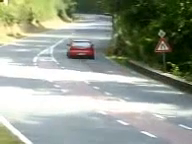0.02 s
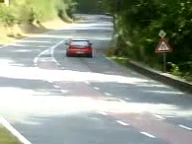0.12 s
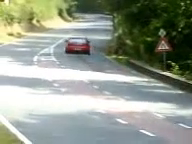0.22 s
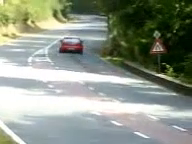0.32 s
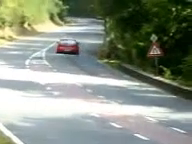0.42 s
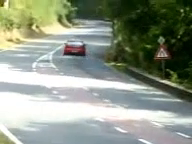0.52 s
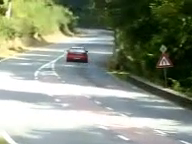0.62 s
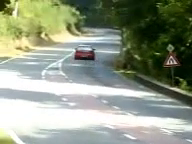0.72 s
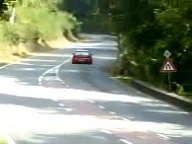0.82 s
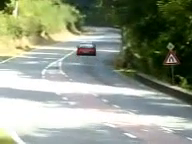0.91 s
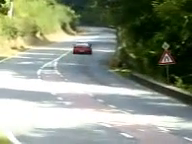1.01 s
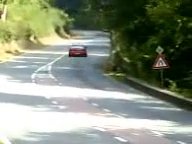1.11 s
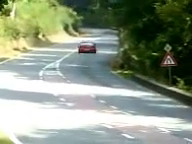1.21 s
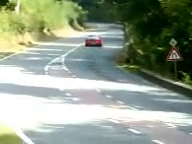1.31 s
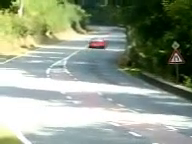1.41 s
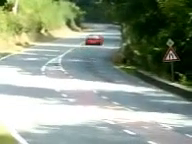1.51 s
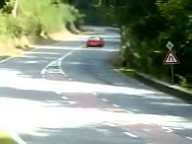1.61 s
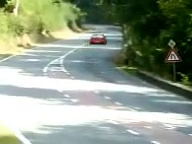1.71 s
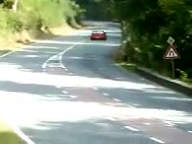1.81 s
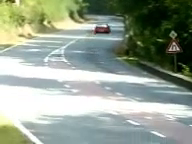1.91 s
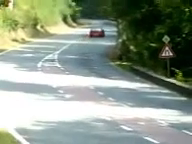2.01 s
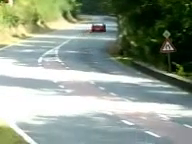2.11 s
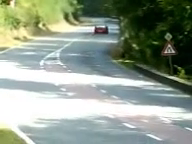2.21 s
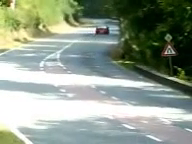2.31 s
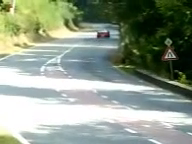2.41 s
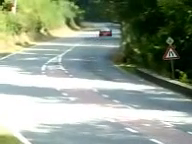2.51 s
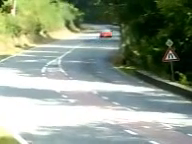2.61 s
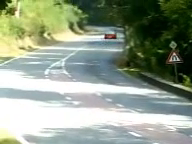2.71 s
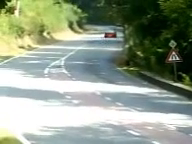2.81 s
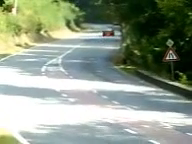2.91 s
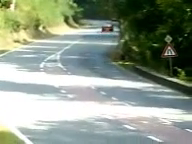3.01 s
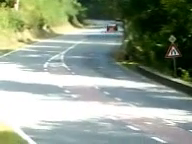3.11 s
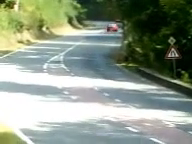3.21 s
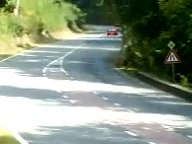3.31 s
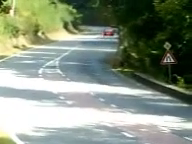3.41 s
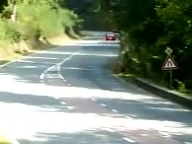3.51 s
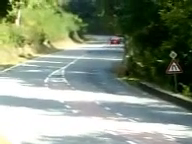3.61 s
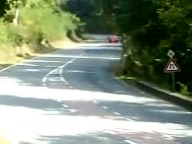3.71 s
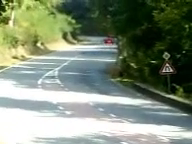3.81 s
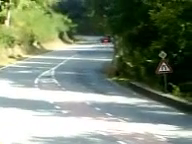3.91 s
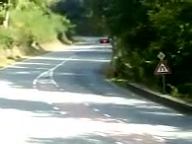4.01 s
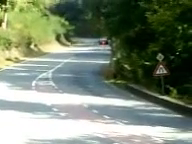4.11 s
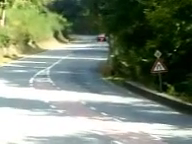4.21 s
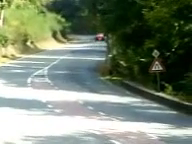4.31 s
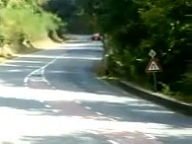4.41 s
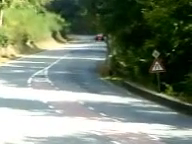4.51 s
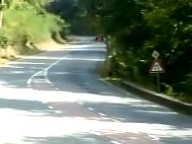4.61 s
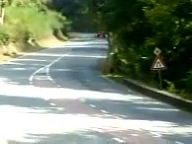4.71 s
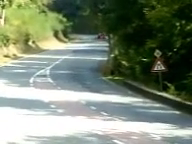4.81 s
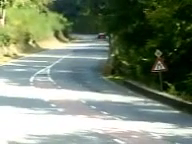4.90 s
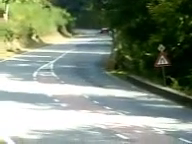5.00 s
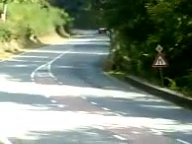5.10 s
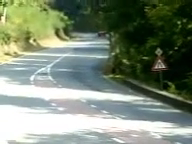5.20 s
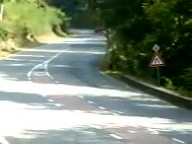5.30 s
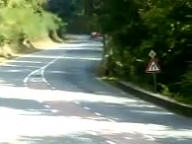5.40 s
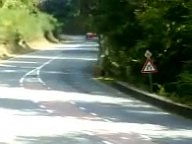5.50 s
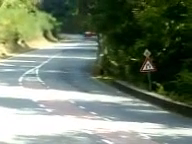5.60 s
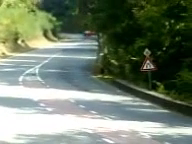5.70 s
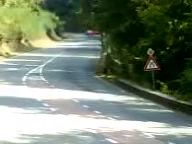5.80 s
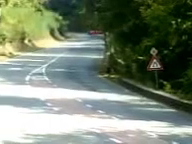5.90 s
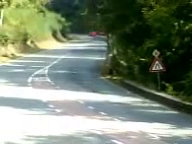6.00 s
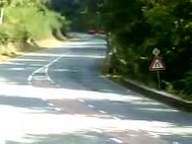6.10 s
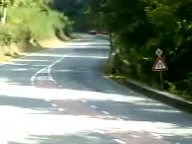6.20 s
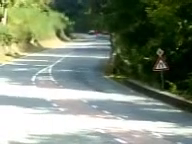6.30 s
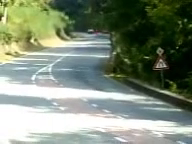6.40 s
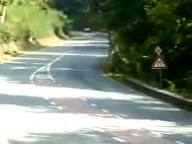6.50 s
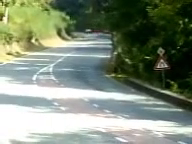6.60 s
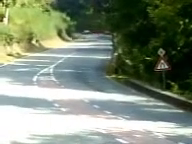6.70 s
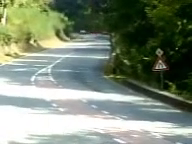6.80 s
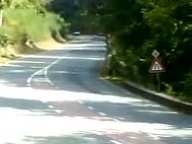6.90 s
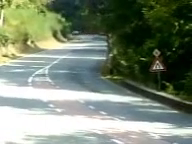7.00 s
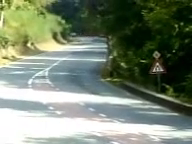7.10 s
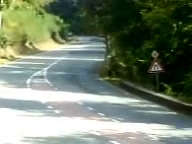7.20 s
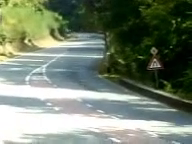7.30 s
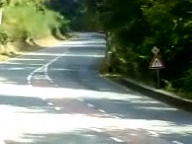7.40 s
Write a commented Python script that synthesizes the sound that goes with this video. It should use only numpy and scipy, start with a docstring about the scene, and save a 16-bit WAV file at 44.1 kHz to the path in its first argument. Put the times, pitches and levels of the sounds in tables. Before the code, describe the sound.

From 0 s a four-cylinder race car is already close and leaving at full throttle: a loud, gritty exhaust blare with low boom, honk, tearing upper rasp, gas hiss and tyre rumble, overloading the microphone into fine crackle. Within about 1 s the hiss and rumble fall away sharply. The engine stays in one gear, its firing note climbing smoothly from about 150 to 190 Hz by the end, the climb gradually easing. Around 2.4 s a brassy rasp flares, then it thins; near 3.9 s a narrower, nasal buzz stands out, followed by a low boom around 4.3 s. Near 5.4 s the boom and honk return briefly, then the sound becomes darker and more distant, with a last hollow honk around 7 s before weakening to 7.5 s. Short diffuse echoes from trees and banks blur it throughout. The outdoor pickup is narrow-band, with little above 4 kHz besides the crackle.

```python
"""Race car pulling away up a wooded hill road

A four-cylinder car leaves at full throttle, its revs climbing in one long gear: a stack of firing orders
booms low down and rasps higher up, its colour shifting as the car bends away between the banks.
Noise bands make the gas, hiss and tyre rumble; a decaying noise tail makes the echo from the trees.
A narrow-band microphone overloads while the car is still close."""
import sys
import numpy as np
from scipy import signal
from scipy.fft import rfft, irfft, next_fast_len
from scipy.io import wavfile
from scipy.ndimage import uniform_filter1d, minimum_filter1d

SR = 44100
rng = np.random.default_rng(int(sys.argv[2]) if len(sys.argv) > 2 else 0)


def unload_wav(signal):
    """Save mono or channel-first audio to the path in sys.argv[1] as 16-bit WAV at rate SR, clipped to [-1, 1]."""
    wavfile.write(
        sys.argv[1],
        SR,
        np.round(np.clip(np.atleast_2d(signal).T, -1, 1) * 32767).astype(np.int16),
    )


N = 330309
T = np.arange(N) / SR
SLOW_T = T[::64]  # slow clock for levels and wavering

# engine speed, its climb easing as drag builds: t/s, firing rate f/Hz
ENGINE_SPEED = [(0, 150.3), (1.05, 157.4), (2.1, 163.8), (3.3, 171.6), (4.5, 176.3), (5.75, 184.6),
                (6.9, 188.5), (7.49, 190.6)]


def undb(db):
    """Decibels to gain."""
    return 10 ** (np.asarray(db) / 20)


def unit(x):
    """Scale to rms 1."""
    return x / np.sqrt(np.mean(np.abs(x) ** 2))


def curves(table, t=T):
    """The columns of a table after the first, interpolated at the times t."""
    s, *columns = np.transpose(table)
    return [np.interp(t, s, column) for column in columns]


def colour(x, points):
    """Filter by a (Hz, dB) spectrum, straight between points on a log frequency scale."""
    size = next_fast_len(N + 4096)
    point_hz, point_db = np.transpose(points)
    bin_hz = np.maximum(np.arange(size // 2 + 1) * SR / size, 1)
    gain = undb(np.interp(np.log(bin_hz), np.log(point_hz), point_db))
    return irfft(rfft(x, size) * gain, size)[:N]


def wander(hz):
    """Smooth chance of rms 1 on the slow clock, with most of its motion under hz."""
    keep = np.exp(-2 * np.pi * hz * SLOW_T[1])
    size = len(SLOW_T)
    noise = rng.standard_normal(2 * size)
    # two equal one-pole smoothers; the first half is run-in
    return unit(signal.lfilter([1], np.poly([keep, keep]), noise)[size:])


def fast(slow):
    """From the slow clock to the sample clock."""
    return np.interp(T, SLOW_T, slow)


def exhaust(turns, rough, scatter=1.0, scatter_hz=28, firing_db=1.25):
    """Firing note as a stack of orders; turbulent gas and air make the high ones flutter most."""
    # strength of the four cylinders in firing order, at roughness 1: level/dB
    cylinder_db = [-0.15, 0.66, -2.2, -0.44]
    note = np.zeros(N)
    for order, level in enumerate(order_levels(), 1):
        spread = scatter * rough * order / (order + 10.0)
        # a steady part plus a scattered part, at constant mean power
        scattered = wander(scatter_hz) + 1j * wander(scatter_hz)
        path = (1 + spread * scattered) / np.sqrt(1 + 2 * spread ** 2)
        phase = np.unwrap(np.angle(path)) + rng.uniform(0, 2 * np.pi)
        amplitude = fast(np.sqrt(2) * level * np.abs(path))
        note += amplitude * np.cos(2 * np.pi * order * turns + fast(phase))
    # the cylinders differ, and no two firings are equally strong
    firing = np.arange(2000)
    size_db = np.resize(cylinder_db, len(firing)) + firing_db * rng.standard_normal(len(firing))
    return note * undb(np.interp(turns, firing, size_db) * fast(rough))


def order_levels(tone_fade_db=0.6, second_fade_db=0.36, third_fade_db=0.96):
    """Rms of each firing order as it climbs through the resonances of the exhaust."""
    # firing tone, the first order: t/s, level/dB
    tone_table = [(0, -22), (.3, -29), (1.4, -30.5), (2.8, -39.5), (5.24, -40.5), (5.48, -33.5),
                  (6.1, -35.5), (6.8, -40), (7.49, -38.5)]
    # low boom of the exhaust: t/s, second order level/dB, third order level/dB
    boom_table = [(0.0, -14.0, -12.5), (0.44, -18.5, -18.5), (1.2, -15.5, -25), (1.84, -22.0, -35.5),
                  (2.98, -25, -37.5), (3.34, -23, -29.0), (3.6, -25.0, -40.5), (3.88, -26, -30.5),
                  (4.04, -27, -42), (4.24, -20.5, -28.5), (4.76, -22, -30.5), (5.14, -32.5, -36.0),
                  (5.38, -20, -24), (5.8, -28.5, -27), (5.96, -21, -29.5), (6.82, -25.5, -34),
                  (7.22, -39, -51.5), (7.49, -33.5, -46.5)]
    # honk of the pipe: t/s, level/dB
    honk_table = [(0, -22), (.18, -14.5), (.58, -20), (.78, -29), (2.1, -39), (2.3, -35), (3.7, -30.5),
                  (5.05, -37), (5.55, -26), (6.5, -31), (7.0, -21), (7.49, -37)]
    # brassy rasp of the tailpipe: t/s, level/dB, centre f/Hz, width/Hz
    rasp_table = [(0, -14, 1930, 794), (.24, -23.5, 1480, 905), (.45, -16, 1830, 720),
                  (.8, -20.5, 1410, 331), (1.0, -19.5, 1400, 302), (1.12, -38, 1290, 1000),
                  (1.5, -29, 1480, 1600), (1.75, -22, 1698, 420), (1.95, -26, 1540, 660),
                  (2.38, -14, 1610, 547), (2.62, -19, 1780, 450), (2.76, -18.5, 1360, 200),
                  (3.55, -24.5, 1502, 346), (3.9, -14.5, 1590, 153), (4.2, -17.5, 1588, 180),
                  (4.7, -34, 1630, 220), (4.95, -23.5, 1590, 390), (5.4, -22.5, 1247, 337),
                  (5.8, -34.5, 1220, 400), (6.1, -25, 1074, 650), (6.42, -34, 1296, 450),
                  (6.62, -27.5, 1330, 260), (7.49, -32.5, 1140, 501.5)]
    # tearing edge above the rasp: t/s, level/dB, centre f/Hz, width/Hz
    edge_table = [(0, -17.5, 2780, 1000), (.28, -17.5, 2770, 700), (.5, -15, 2280, 910),
                  (.97, -22.5, 2620, 800), (1.13, -24, 2780, 1300), (1.75, -23.5, 2200, 1500),
                  (1.96, -18.5, 2370, 600), (2.45, -22.5, 2004, 600), (2.95, -31.5, 2110, 926),
                  (3.12, -27.5, 2700, 260), (3.37, -27.5, 2700, 173.5), (3.48, -37.5, 2780, 597),
                  (3.92, -28, 2816, 550), (4.45, -32.5, 2590, 788), (4.8, -37, 2240, 1214),
                  (5.15, -30, 2190, 900), (5.68, -41, 2600, 1000), (6.1, -37, 1900, 1310),
                  (7.49, -36.5, 2200, 1490)]

    firing_hz, = curves(ENGINE_SPEED, SLOW_T)
    tone_db, = curves(tone_table, SLOW_T)
    second_db, third_db = curves(boom_table, SLOW_T)
    honk_db, = curves(honk_table, SLOW_T)
    rasp_db, rasp_hz, rasp_width_hz = curves(rasp_table, SLOW_T)
    edge_db, edge_hz, edge_width_hz = curves(edge_table, SLOW_T)
    order_hz = np.arange(1, 26)[:, None] * firing_hz  # 25 orders
    honk = resonance(order_hz, 721, width_hz=150, low_hz=627, high_hz=1030,
                     db=honk_db, skirt_db=-10.5, fade_db=2.5, swell_db=1.2)
    rasp = resonance(order_hz, rasp_hz, rasp_width_hz, low_hz=960, high_hz=2280,
                     db=rasp_db, skirt_db=-39, fade_db=3.5, swell_db=0.92)
    edge = resonance(order_hz, edge_hz, edge_width_hz, low_hz=1700, high_hz=3090,
                     db=edge_db, skirt_db=-21, fade_db=6.0, swell_db=1.93)
    levels = np.sqrt(honk ** 2 + rasp ** 2 + edge ** 2)
    # the three lowest orders stand alone and waver less
    lows = [(tone_db, tone_fade_db), (second_db, second_fade_db), (third_db, third_fade_db)]
    levels[:3] = undb([db + fade_db * wander(4) for db, fade_db in lows])
    return levels


def resonance(order_hz, centre_hz, width_hz, low_hz, high_hz, db, skirt_db, fade_db, swell_db):
    """Share a level among the orders between low and high: a steep peak on a flat skirt."""
    gain = 1 / (1 + (2 * (order_hz - centre_hz) / width_hz) ** 2) + undb(skirt_db)
    gain = gain / np.hypot(1, (low_hz / order_hz) ** 20)
    gain = gain / np.hypot(1, (order_hz / high_hz) ** 20)
    # paths over road and banks add or cancel: each order fades on its own, and the whole band swells
    gain = gain * undb(fade_db * np.array([wander(5.25) for _ in order_hz]))
    band_level = undb(db + swell_db * wander(3.6))
    return band_level * gain / np.linalg.norm(gain, axis=0)


def rush(turns):
    """Gas puffing with every firing, hiss on top and tyre rumble, the gas flickering in moving air."""
    start_m, speed_m_s = 11.3, 39.3  # distance at the start and road speed
    nearness = start_m / (start_m + speed_m_s * T)
    gate = 1 + 0.53 * np.cos(2 * np.pi * turns)  # one puff per firing
    return gas_roar(gate, nearness) + tyre_rumble(nearness) + top_hiss(gate)


def gas_roar(gate, nearness, gust_db=1.46, flicker_db=5.0):
    """Gas noise in 14 bands that flicker apart and gust together, falling with distance to a floor."""
    # spectrum of the gas: f/Hz, relative level/dB per band of about a third of an octave
    gas_spectrum = [(130, -21), (250, -19.5), (400, -12), (650, -14.5), (1000, -10.5), (1800, -10),
                    (2800, -19.5)]
    near_db, far_db = -19.5, -39.5  # at the starting distance; far off, what the banks carry
    point_hz, point_db = np.transpose(gas_spectrum)
    gust = gust_db * wander(3.4)
    roar = 0
    for band_hz in np.geomspace(130, 2900, 14):
        spectrum_db = np.interp(np.log(band_hz), np.log(point_hz), point_db)
        band_db = spectrum_db + gust + flicker_db * wander(4.9)
        roar = roar + hiss(band_hz, gate) * fast(undb(band_db))
    return roar * np.hypot(undb(near_db) * nearness, undb(far_db))


def top_hiss(gate, flicker_db=3.25):
    """Puffing hiss at the top of the band, flickering in the moving air."""
    # hiss ahead of the microphone: t/s, level/dB
    hiss_table = [(0, -15.5), (.8, -37), (1.7, -41), (2.8, -51.5), (4.1, -39.5), (5.25, -40.5),
                  (5.5, -47.5), (6.6, -46), (7.49, -42)]
    level_db, = curves(hiss_table)
    return hiss(3550, gate) * undb(level_db + fast(flicker_db * wander(8.1)))


def hiss(hz, gate=1):
    """A band of noise about a third of an octave wide, rms 1."""
    band = [(hz / 2, -50), (hz / 1.1, 0), (hz * 1.1, 0), (hz * 2, -50)]
    return unit(colour(rng.standard_normal(N) * gate, band))


def tyre_rumble(nearness):
    """Low noise of tyres on the road, falling with distance to what the banks carry."""
    near_db, far_db = -31.5, -62.5
    spectrum = [(20, -17.5), (50, -3.5), (100, 2.5), (200, 1.5), (600, -38.0)]
    rumble = unit(colour(rng.standard_normal(N), spectrum))
    return rumble * np.hypot(undb(near_db) * nearness, undb(far_db))


def trees(x, t60=0.72, first_s=0.037):
    """Banks, trunks and leaves send back a short diffuse echo, a soft-onset decaying noise tail."""
    t = T[:SR]
    envelope = np.exp(-np.log(1000) * t / t60) * (1 - np.exp(-t / first_s))
    tail = rng.standard_normal(SR) * envelope
    echo = signal.fftconvolve(x, tail / np.linalg.norm(tail))[:N]
    return colour(echo, [(150, -4.5), (400, -1.5), (1000, -11.5), (3500, 3)])


def scene():
    """The car on the road with its echo."""
    # roughness of the note, in flutter, firing strength and timing: t/s, amount (0-1)
    rough_table = [(0, 0.6), (1.2, 0.74), (2.7, 0.36), (3.5, 0.49), (3.9, 0.35), (5, 0.61), (5.6, .33),
                   (6.2, 0.58), (7.49, 0.4)]
    firing_hz, = curves(ENGINE_SPEED)
    rough, = curves(rough_table, SLOW_T)
    # uneven combustion makes each firing come slightly early or late; turns count firings
    jitter = rough * (0.0096 * wander(100) + 0.021 * wander(6.9))
    turns = np.cumsum(firing_hz) / SR + fast(jitter)
    car = exhaust(turns, rough) + rush(turns)
    return (car + undb(-7.5) * trees(car))[None]


def record(dry):
    """The narrow-band microphone feeds a quick limiter; what it lets through clips into a fine crackle."""
    # response of the microphone: f/Hz, level/dB
    mic_response = [(20, 2), (2850, -1), (3200, -5), (3500, -12.5), (3900, -21.5), (4120, -26),
                    (4350, -63.5)]
    x = colour(dry[0], mic_response)
    ceiling = 1.0
    gain = ceiling / np.maximum(np.abs(x), ceiling)
    # hold the lowest gain, then smooth it, each over about 7 ms
    gain = uniform_filter1d(minimum_filter1d(gain, size=300), size=300)
    clipped = np.clip(x * gain, -.71, .71)
    top_cut = signal.ellip(8, .2, 70, 15800, fs=SR, output="sos")  # low-pass, Hz
    return signal.sosfilt(top_cut, clipped)[None]


dry = scene()
out = record(dry)
unload_wav(out)
```